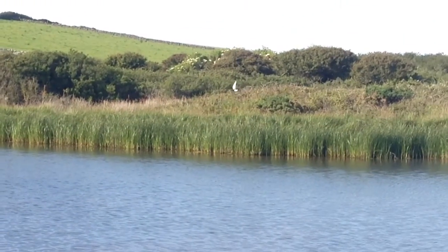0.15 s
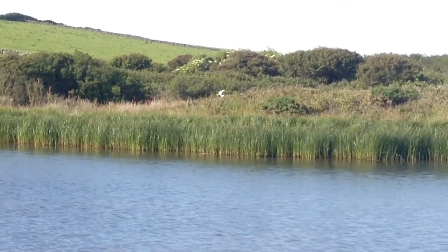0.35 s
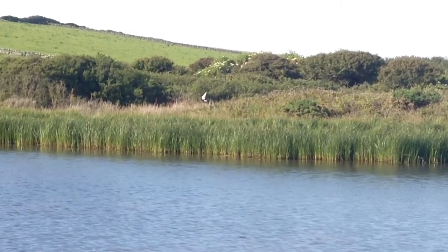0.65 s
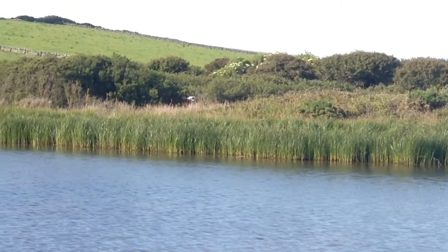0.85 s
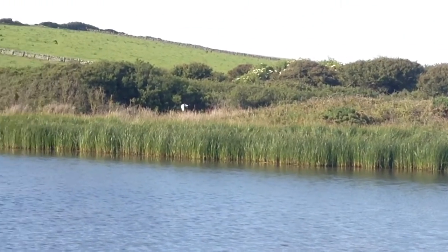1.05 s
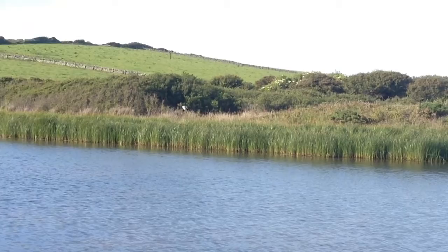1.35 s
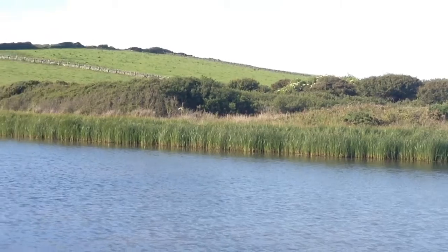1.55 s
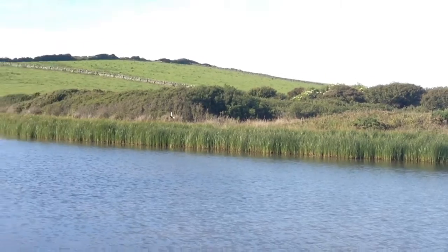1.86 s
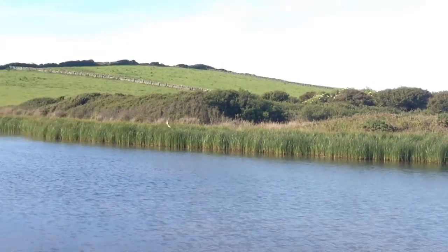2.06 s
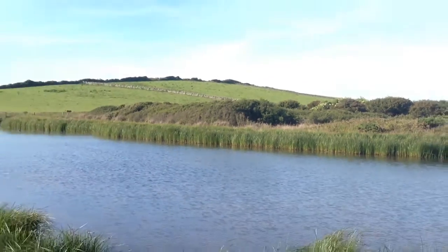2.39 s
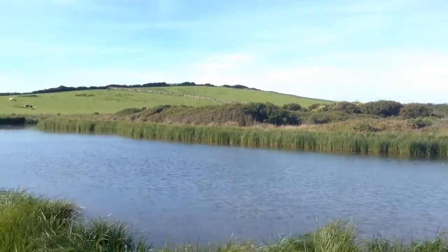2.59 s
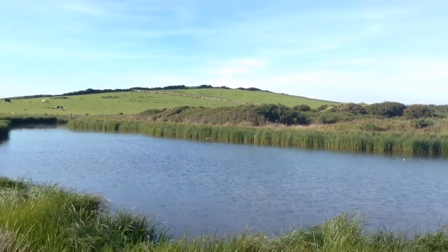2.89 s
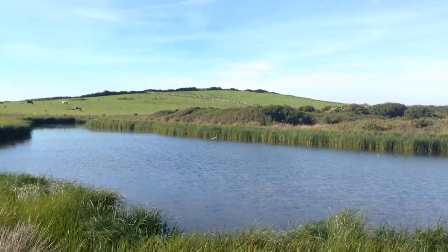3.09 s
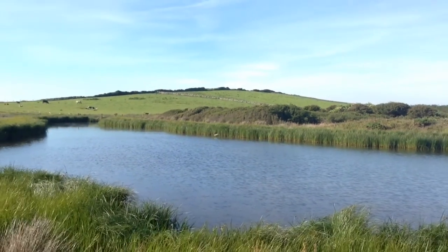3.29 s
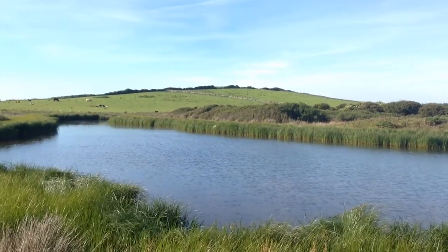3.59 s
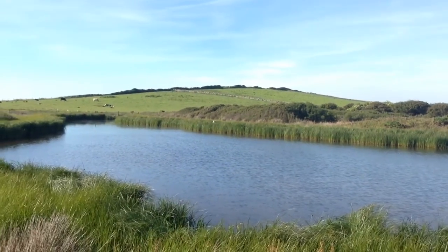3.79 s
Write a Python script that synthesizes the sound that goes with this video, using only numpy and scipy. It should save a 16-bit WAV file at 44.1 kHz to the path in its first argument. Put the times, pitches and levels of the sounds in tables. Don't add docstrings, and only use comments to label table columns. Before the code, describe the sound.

Shorebirds pipe in fast, overlapping high whistles across a reedy lagoon, faint at first, then denser and louder. Light wind rumbles on a hand-held camera microphone, with steady hiss and a few handling ticks around one second.

```python
import sys
import numpy as np
from scipy import signal
from scipy.fft import rfft, irfft
from scipy.io import wavfile
from scipy.ndimage import uniform_filter1d

SR = 44100
rng = np.random.default_rng(int(sys.argv[2]) if len(sys.argv) > 2 else 0)


def master(y):
    cut = np.clip(np.atleast_2d(y).T, -1, 1)
    pcm = np.round(cut * 32767)
    wavfile.write(sys.argv[1], SR, pcm.astype(np.int16))


def amplitude_ratio(level_db):
    exponent = np.asarray(level_db, float) / 20
    return 10 ** exponent


N = 173754

# (plateau start [s], plateau length [s], top pitch [Hz], level [dB])
FAR_NOTES = [(-0.01, 0.1, 3370, -56.5), (-0.004, 0.028, 3204, -50.5), (0.068, 0.032, 3140, -52),
             (0.13, 0.073, 3217, -58.5), (0.175, 0.017, 3086, -57), (0.265, 0.037, 3176, -53),
             (0.355, 0.048, 3160, -58), (0.4, 0.076, 3210, -65.5), (0.514, 0.022, 3190, -58),
             (0.526, 0.046, 3150, -58.5), (0.642, 0.045, 3195, -60.5), (0.752, 0.024, 3200, -59.5),
             (0.788, 0.046, 3190, -61), (0.88, 0.043, 3217, -56), (0.981, 0.033, 3200, -52.5),
             (1.044, 0.039, 3170, -57), (1.116, 0.053, 3244, -53.5), (1.176, 0.025, 3110, -58),
             (1.229, 0.024, 3200, -48.5), (1.301, 0.044, 3158, -50), (1.357, 0.059, 3242, -49),
             (1.43, 0.034, 3094, -52), (1.473, 0.022, 3227, -49), (1.552, 0.049, 3140, -49),
             (1.606, 0.048, 2980, -67), (1.608, 0.05, 3225, -53.5), (1.7, 0.018, 3124, -53),
             (1.718, 0.02, 3204, -50), (1.729, 0.026, 3010, -51), (1.809, 0.052, 3157, -45)]
# (plateau start [s], plateau length [s], top pitch [Hz], level [dB])
FAINT_NOTES = [
    (0.194, 0.014, 2640, -55),
    (0.28, 0.02, 2160, -64),
    (0.418, 0.024, 2910, -58.5),
    (0.688, 0.019, 2460, -66),
    (0.748, 0.033, 2560, -69),
    (0.814, 0.013, 2620, -61),
    (1.088, 0.0116, 2600, -61),
    (1.208, 0.031, 2780, -61),
    (1.49, 0.014, 2415, -62.5),
    (1.628, 0.013, 2880, -62),
]
# (plateau start [s], plateau length [s], top pitch [Hz], level [dB], abruptness of start [doublings])
NEAR_NOTES = [(1.85, 0.042, 3240, -52, 0.53), (1.948, 0.041, 3210, -52, 1.65),
              (2.068, 0.061, 3190, -46.5, 0.42), (2.088, 0.031, 3273, -53.5, 1.04),
              (2.188, 0.026, 3234, -50.0, 1.7), (2.214, 0.033, 3116, -56, -0.24),
              (2.32, 0.037, 3140, -45.5, -0.84), (2.323, 0.041, 3270, -48, 1.2),
              (2.427, 0.02, 3255, -50.5, 0.33), (2.458, 0.026, 3100, -56.5, 1.7),
              (2.56, 0.054, 3265, -53, .3), (2.568, 0.034, 3143, -48, -.3), (2.672, 0.025, 3260, -54, .5),
              (2.803, 0.031, 3195, -51.5, .3), (2.822, 0.029, 3266, -50, .3),
              (2.914, 0.033, 3270, -53, 0.15), (3.056, 0.027, 3270, -48, -0.12),
              (3.125, 0.033, 3114, -52.5, .8), (3.145, 0.034, 3240, -52, .5),
              (3.286, 0.039, 3245, -42.5, 0.54), (3.39, 0.018, 3250, -43, 2),
              (3.403, 0.02, 3206, -39.5, 1.15), (3.52, 0.043, 3250, -41, -.1),
              (3.554, 0.12, 3359, -46.5, -.3), (3.629, 0.022, 3250, -42.5, 0.93),
              (3.674, 0.023, 3200, -43, 1.7), (3.752, 0.034, 3260, -41.5, -.8),
              (3.765, 0.044, 3186, -44, 1), (3.867, 0.029, 3210, -45, 1.28),
              (3.88, 0.022, 3044, -42.5, -.2), (3.93, 0.029, 3190, -46, 0.26)]
# (plateau start [s], plateau length [s], top pitch [Hz], level [dB], abruptness of start [doublings])
LOW_NOTES = [(1.983, 0.03, 2590, -53, 0.54), (2.042, 0.014, 2980, -63, 1.2), (2.128, 0.015, 2900, -71, 1.7),
             (2.148, 0.008, 2900, -55, 0.93), (2.26, 0.018, 2890, -52, -0.48),
             (2.318, 0.011, 2862, -54, 0.39), (2.392, 0.016, 2922, -52.5, -0.0022),
             (2.438, 0.02, 2230, -55.5, 0.48), (2.483, 0.02, 2950, -55.5, 1.2),
             (2.515, 0.0068, 3012, -50.5, -1.4), (2.648, 0.019, 2800, -50.5, .4),
             (2.701, 0.016, 2476, -52, 0.36), (2.71, 0.038, 3080, -58.5, 0.49),
             (2.786, 0.024, 2542, -57, .1), (2.851, 0.024, 2997, -51, 0.88),
             (2.912, 0.014, 2845, -55.5, .6), (2.948, 0.018, 2952, -51.5, -0.085),
             (2.98, 0.038, 3020, -58, .4), (3.091, 0.037, 2460, -57, 1.4), (3.148, 0.013, 2830, -67, .6),
             (3.185, 0.014, 2950, -50, -0.1), (3.245, 0.024, 2600, -59.5, .1),
             (3.274, 0.0088, 3000, -52, 0.5), (3.272, 0.0056, 2430, -64, 1.4),
             (3.31, 0.005, 2630, -54, -.6), (3.334, 0.0088, 2780, -55, 1.9),
             (3.378, 0.023, 2464, -51.5, 1.4), (3.422, 0.0089, 2920, -44, -0.48),
             (3.548, 0.019, 2870, -50, 0.86), (3.615, 0.01, 2720, -55, -0.93),
             (3.652, 0.014, 2950, -38.5, -.5), (3.656, 0.022, 2530, -47.5, 1.04),
             (3.676, 0.009, 3080, -60, -0.23), (3.7, 0.012, 2850, -62, 1.6), (3.803, 0.012, 2920, -61, 1.4),
             (3.903, 0.022, 2450, -50.5, 1.4), (3.93, 0.023, 2420, -61, 1.5)]
# (time [s], level [dB])
HEAD_TURNS = [
    (0, -16.5),
    (1.0, -13),
    (1.3, -7.5),
    (2.0, -13.5),
    (3.94, -16.5),
]
# (time [s], level [dB])
WIND_GUSTS = [
    (0, -59.5),
    (.3, -64),
    (.55, -56.5),
    (1.2, -57),
    (1.65, -54.5),
    (2.0, -57.5),
    (2.6, -59.5),
    (3.94, -63.5),
]
# (frequency [Hz], density [dB per Hz])
WIND_COLOUR = [(12, -81), (20, -36), (59, -3), (75, 4), (109, -5.5), (168, -21), (300, -23.5), (390, -26),
               (660, -120)]
# (frequency [Hz], density [dB per Hz])
AIR_COLOUR = [(150, -7), (500, -0.5), (1000, -9), (2600, -15.5), (4000, -9)]
# (frequency [Hz], density [dB per Hz])
HISS_COLOUR = [(1000, -0.4), (7000, 0.3), (15330, -4.5)]
# (time [s], peak level [dB], ring pitch [Hz], length [s])
CAMERA_TICKS = [(0.885, -49, 1960, 0.0015), (0.9507, -40, 1740, 0.0028), (0.956, -39, 2030, 0.013),
                (0.9662, -34, 1530, 0.0037), (1, -41, 2070, 0.024), (1.028, -33.5, 3100, 0.0041),
                (1.0298, -37, 6950, 0.005), (1.032, -44.5, 1750, 0.0097), (1.044, -49.5, 930, 0.013),
                (1.061, -46, 1900, 0.0054), (1.186, -47, 1890, 0.0079), (1.248, -52, 1340, 0.00085),
                (1.2623, -40, 1940, 0.00034), (1.2648, -42, 1620, 0.0025), (2.133, -46, 2620, 0.013),
                (3.045, -37, 3970, 0.0017), (3.245, -51, 348, 0.014)]
# (start [s], length [s], first pitch [Hz], last pitch [Hz], level [dB])
PEEP_NOTES = [
    (2.38, 0.03, 3620, 3350, -68),
    (2.686, 0.06, 4100, 3760, -64),
    (2.77, 0.03, 3970, 4000, -66),
    (2.865, 0.035, 4230, 3860, -67),
    (2.944, 0.16, 3700, 4150, -69),
    (3.36, 0.037, 3820, 3850, -71),
]
# (lowest [Hz], highest [Hz], note level where hiding starts [dB])
HIDDEN_BANDS = [
    (3520, 3820, -59),
    (3820, 4350, -50),
]

CREST_SHARE, DOME_SAG, FULL_DOME_S = 0.414, 0.05, 0.0315
RISE_S, RISE_STEP, RISE_PER_S = 0.022, 0.09, 13.0
FALL_S, FALL_STEP, FALL_PER_S = 0.027, 0.07, 12.0
STEP_S, EDGE_S, SWELL_DB = 0.0041, 0.012, 3.5
THROAT_HZ, THROAT_DB_PER_KHZ, BREAK_DB = 2500, 14, 3.0
BEAK_HZ, BEAK_WIDTH_HZ, BEAK_DB = 2960, 170, 7.0
FLUTTER_DB, SLOW_FALL_SHARE = 2, 0.368

FLOCK_PER_S, FLOCK_DB = 33, -67.5
MARSH_T60_S, MARSH_DB, SCATTER_S = 0.23, -19.5, 0.004
AIR_DB, HISS_DB = -69.5, -68.5
TICK_WIDTH, TICK_DULL_HZ, TICK_LOW_DB = 0.25, 8000, 13


def rms_one(x):
    return x / np.sqrt(np.mean(x ** 2) + 1e-20)


def drift(rate):
    r = np.exp(-80 * np.pi * rate / SR)
    raw = rng.standard_normal(N // 40 + 2002)
    slow = signal.lfilter([1], [1, -2 * r, r * r], raw)[2000:]
    return np.interp(np.arange(N) / 40, np.arange(len(slow)), rms_one(slow))


def coloured(spectrum, patchy_db, rate):
    hz, db = np.transpose(spectrum)
    grid = np.arange(1, N // 2 + 2) * SR / N
    level_db = np.interp(np.log(grid), np.log(hz), db, left=-90, right=-90)
    shape = rfft(rng.standard_normal(N)) * amplitude_ratio(level_db)
    band = np.floor(2 * np.log2(grid)).astype(int)
    together = drift(rate / 4)
    noise = np.zeros(N)
    for k in range(int(2 * np.log2(hz[0])), int(2 * np.log2(hz[-1])) + 1):
        flicker_db = patchy_db * (0.23 * together + drift(rate))
        noise += irfft(shape * (band == k), N) * amplitude_ratio(flicker_db)
    return rms_one(noise)


def add(out, s, piece):
    i = int(s * SR)
    a, b = max(i, 0), min(i + len(piece), N)
    out[a:b] += piece[a - i:b - i]


def pipes(rows, rise_db, fall_db, rough, veil_db=0, dome=1, beak_db=BEAK_DB):
    out, waver, shimmer = np.zeros(N), drift(110), drift(72)
    for s, length, hz, db, *abrupt in rows:
        quick, slow = 2 ** sum(abrupt), 2 ** (SLOW_FALL_SHARE * sum(abrupt))
        rise_s = RISE_S / max(quick, 1)
        t = np.arange(-rise_s, length + FALL_S, 1 / SR)
        on = np.clip(1 + t / STEP_S, 0, 1)
        off = np.clip((t - length) / STEP_S, 0, 1)
        glide = 1 - on + off
        u = np.clip((t - CREST_SHARE * length) / (length / 2), -1, 1.1)

        share = 1 - dome * DOME_SAG * min(1, length / FULL_DOME_S) * u ** 2
        share -= (1 - on) * RISE_STEP + off * FALL_STEP
        share += RISE_PER_S * quick * np.minimum(t, 0)
        share -= FALL_PER_S / slow * np.maximum(t - length, 0)
        pitch = hz * share
        first = int(abs(s) * SR)
        chance = waver[(np.arange(len(t)) + first) % N]
        phase = 2 * np.pi * (np.cumsum(pitch * (1 + rough * chance)) / SR + rng.random())

        fade = np.minimum((t + rise_s) * max(quick, 1), length + FALL_S - t)
        edges = np.clip(fade / EDGE_S, 0, 1)
        level_db = (1 - on) * rise_db + off * fall_db - SWELL_DB * u ** 2 + FLUTTER_DB * chance
        level_db += BREAK_DB * np.minimum(chance, 1) * glide
        too_low = np.maximum(min(THROAT_HZ, hz * 0.94) - pitch, 0)
        level_db -= THROAT_DB_PER_KHZ * too_low / 1000
        flare = amplitude_ratio(glide * beak_db * np.exp(-((pitch - BEAK_HZ) / BEAK_WIDTH_HZ) ** 2))
        second_db = np.interp(s, *np.transpose(HEAD_TURNS)) + veil_db + 1.1 * level_db
        second = amplitude_ratio(second_db + 2.0 * shimmer[first % 9000:][:len(t)])
        whistle = flare * amplitude_ratio(level_db) * np.sin(phase) + second * np.sin(2 * phase)
        add(out, s - rise_s, np.sqrt(2) * amplitude_ratio(db) * edges * whistle)
    return out


def flock():
    draw = rng.random((int(FLOCK_PER_S * N / SR), 4))
    start = (np.arange(len(draw)) + draw[:, 0]) / FLOCK_PER_S
    length = 0.004 + 0.01 * draw[:, 1]
    hz = 2450 + 550 * draw[:, 2]
    rows = np.c_[start, length, hz, FLOCK_DB + 6 * draw[:, 3]]
    return pipes(rows, rise_db=-3, fall_db=-5, rough=0.008, veil_db=-3) * amplitude_ratio(2.5 * drift(70))


def marsh(x, wet_db):
    t = np.arange(int(0.4 * SR)) / SR
    answer = rng.standard_normal(len(t)) * amplitude_ratio(-60 * t / MARSH_T60_S)
    answer *= np.clip(t / SCATTER_S - 1, 0, 1)
    answer *= amplitude_ratio(wet_db) / np.sqrt(np.sum(answer ** 2))
    answer[0] = 1
    return signal.fftconvolve(x, answer)[:N]


def wind():
    gust_db = np.interp(np.arange(N) / SR, *np.transpose(WIND_GUSTS))
    return amplitude_ratio(gust_db) * coloured(WIND_COLOUR, patchy_db=5.0, rate=35)


def air():
    return amplitude_ratio(AIR_DB) * coloured(AIR_COLOUR, patchy_db=2.0, rate=14.0)


def hiss():
    return amplitude_ratio(HISS_DB) * coloured(HISS_COLOUR, patchy_db=0.15, rate=15)


def camera():
    out = np.zeros(N)
    for s, db, hz, length in CAMERA_TICKS:
        t = np.arange(int((6 * length + 0.01) * SR)) / SR
        slips = rng.standard_normal(len(t)) ** 3 * t * np.exp(-2 * t / length)
        r, w = np.exp(-np.pi * hz * TICK_WIDTH / SR), 2 * np.pi * hz / SR
        body = signal.lfilter([1, 0, -1], [1, -2 * r * np.cos(w), r * r], slips)
        low_band = signal.butter(2, [hz / 3, hz * 1.15], "band", fs=SR)
        body += amplitude_ratio(TICK_LOW_DB) * signal.lfilter(*low_band, slips)
        add(out, s, amplitude_ratio(db) * body / np.abs(body).max())
    return signal.lfilter(*signal.butter(2, TICK_DULL_HZ, fs=SR), out)


def peeps():
    out, waver = np.zeros(N), drift(90)
    for s, length, from_hz, to_hz, db in PEEP_NOTES:
        t = np.arange(0, length, 1 / SR)
        chance = waver[int(s * SR):][:len(t)]
        pitch = (from_hz + (to_hz - from_hz) * t / length) * (1 + 0.012 * chance)
        phase = 2 * np.pi * np.cumsum(pitch) / SR
        edges = np.clip(np.minimum(t, length - t) / EDGE_S, 0, 1)
        add(out, s, amplitude_ratio(db + 1.5 + 1.9 * chance) * edges * np.sin(phase))
    return out


def scene():
    birds = pipes(FAR_NOTES, rise_db=-7, fall_db=-8.0, rough=0.00094, dome=0.633, beak_db=-8.0)
    birds += pipes(FAINT_NOTES, rise_db=-3.5, fall_db=-4, rough=0.004, veil_db=-7)
    birds += pipes(NEAR_NOTES, rise_db=-4.5, fall_db=-8, rough=0.0021)
    birds += pipes(LOW_NOTES, rise_db=-7.5, fall_db=-8.5, rough=0.0046, veil_db=1)
    calls = marsh(birds, MARSH_DB) + marsh(flock(), -3.5) + marsh(peeps(), -21)
    return (calls + wind() + air() + hiss() + camera())[None]


def hide_hiss(x):
    def band(low, high):
        sos = signal.butter(5, [low, high], "band", fs=SR, output="sos")
        return signal.sosfiltfilt(sos, x)

    note_power = uniform_filter1d(band(3080, 3450) ** 2, size=1400)
    note_db = 10 * np.log10(note_power + 1e-12)
    hidden = 0
    for low, high, db in HIDDEN_BANDS:
        hidden = hidden + 0.97 * np.clip((note_db - db) / 3, 0, 1) * band(low, high)
    return x - hidden


def roll_off(x):
    return signal.sosfilt(signal.butter(12, 15760, fs=SR, output="sos"), x)


def record(dry):
    mix = hide_hiss(dry)
    return roll_off(mix)


dry = scene()
out = record(dry)
master(out)
```